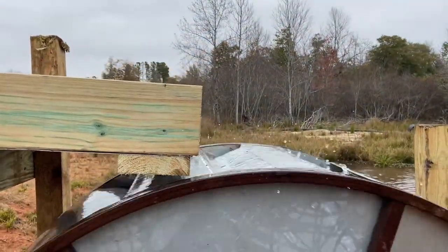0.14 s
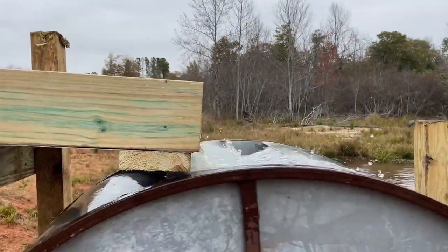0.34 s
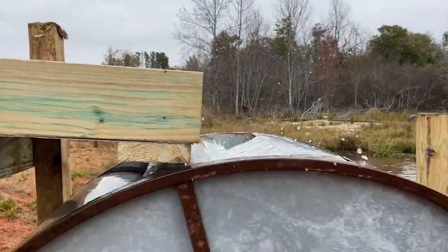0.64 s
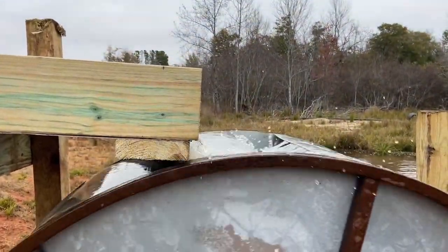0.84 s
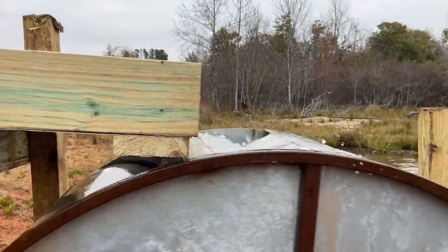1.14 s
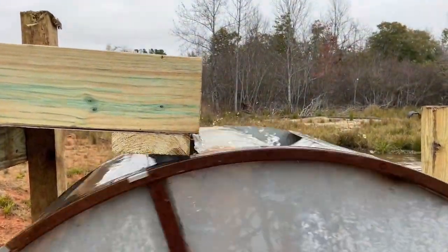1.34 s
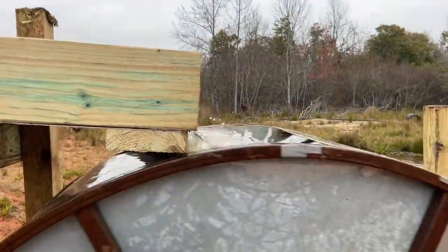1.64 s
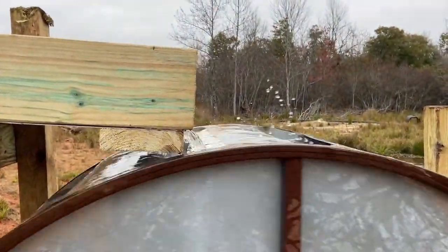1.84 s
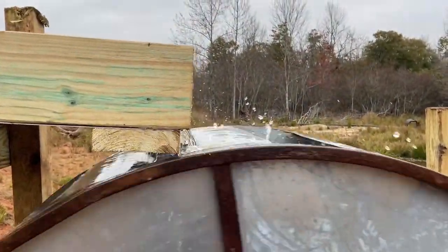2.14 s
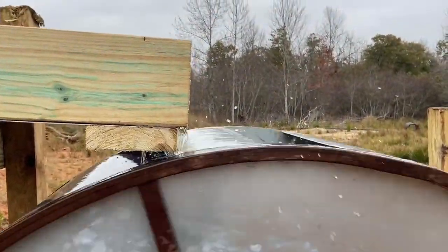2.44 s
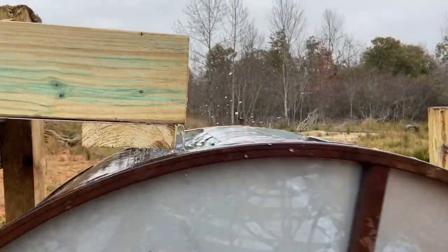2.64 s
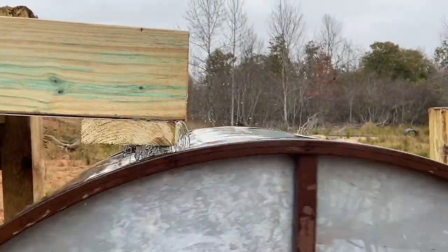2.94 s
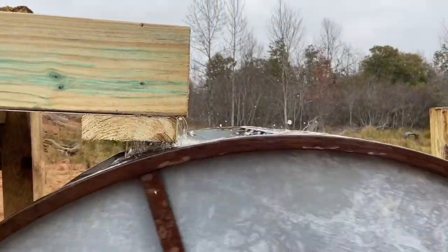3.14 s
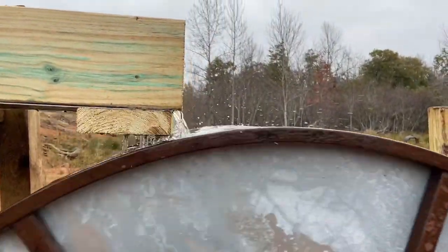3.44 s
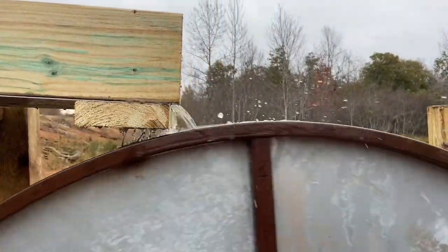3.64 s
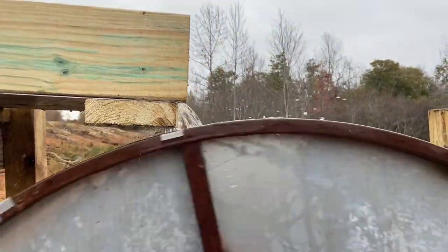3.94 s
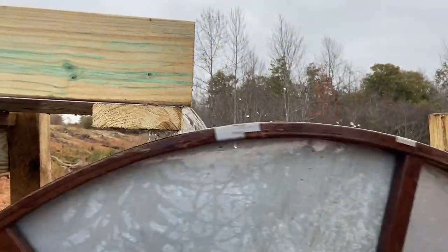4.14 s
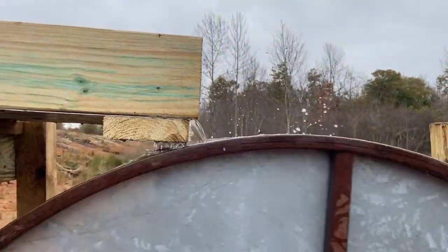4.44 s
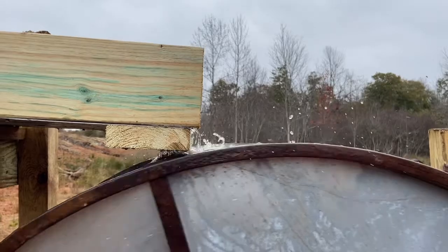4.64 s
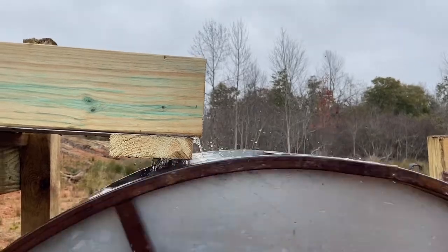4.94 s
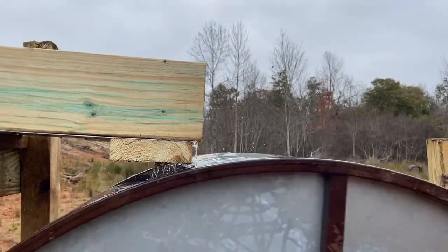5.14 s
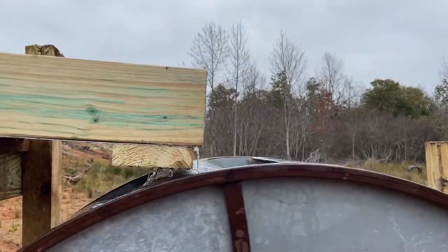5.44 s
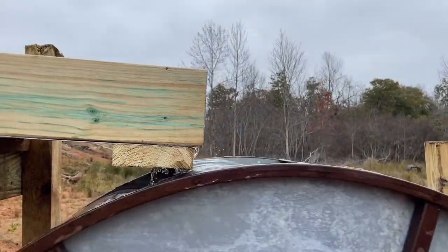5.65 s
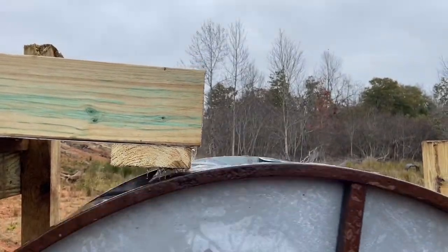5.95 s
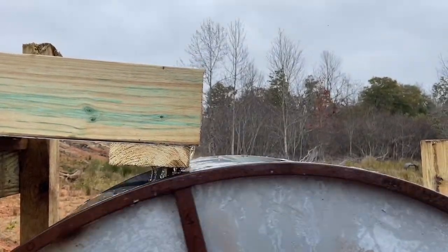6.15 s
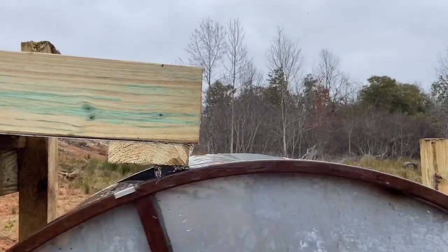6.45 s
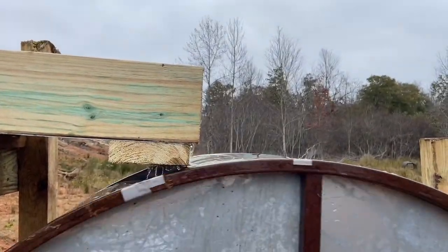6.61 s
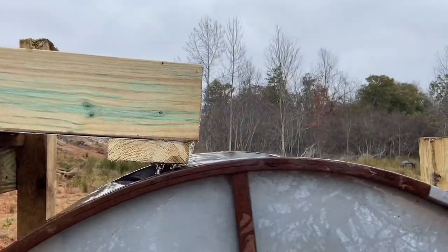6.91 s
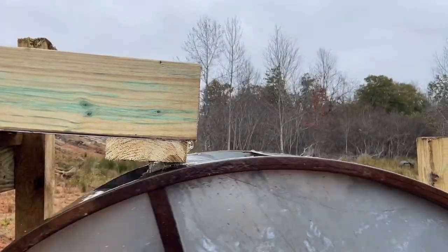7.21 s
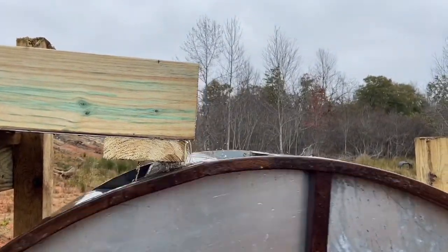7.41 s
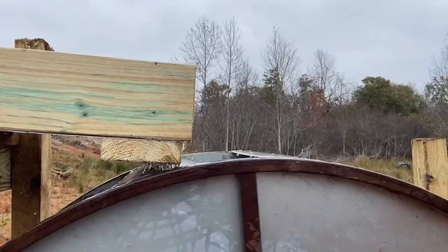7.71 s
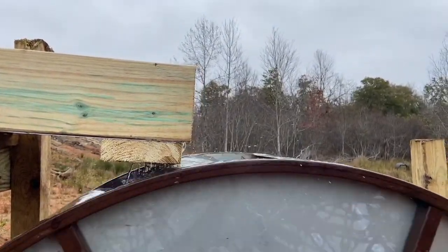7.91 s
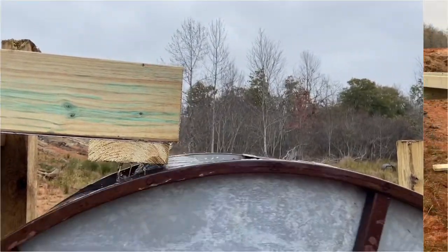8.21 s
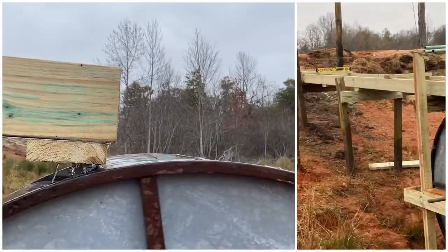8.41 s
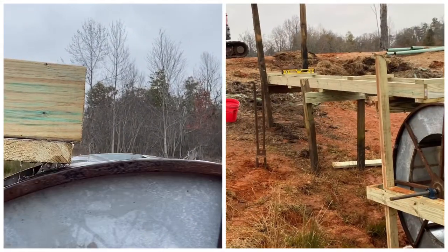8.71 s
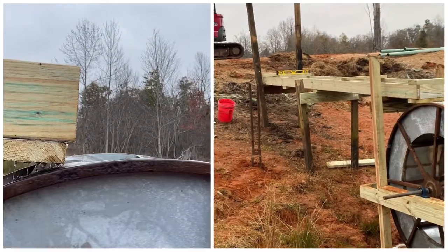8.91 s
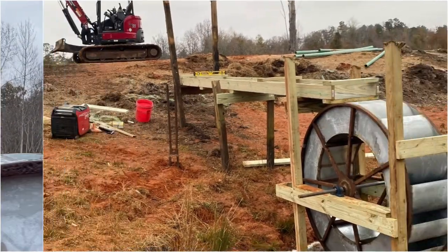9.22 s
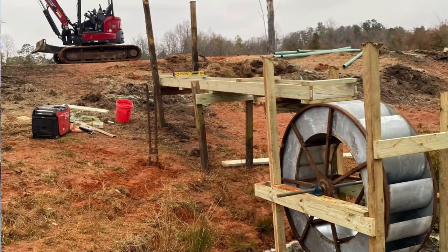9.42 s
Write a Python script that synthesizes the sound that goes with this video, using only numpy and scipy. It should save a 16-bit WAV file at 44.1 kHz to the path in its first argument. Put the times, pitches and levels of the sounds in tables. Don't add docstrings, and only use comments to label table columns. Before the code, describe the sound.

Outdoors, very close stereo to a steel waterwheel fed from a wooden flume. At 0 s the water is fairly quiet: a low hollow drumming, soft sloshing, bubbly rushing and fine hiss, with a faint small engine humming low at left, about 26 pulses a second, with slight valve clatter. Paired high drips tick at 1.1 s. At 2.0 s steel knocks on steel, ringing briefly with a weaker rebound. Glugs and dull thumps continue irregularly; drips and slaps around 3.5 to 3.8 s. From 4 s water and engine grow, with crackling spatter around 4.5 to 5.3 s. A heavy thump lands at 5.6 s, then deep glugs. A big glug and thump come at 6.8 s with a high drip. Splashes at 7.2 and 7.6 s, engine loudest about 7.3 to 7.8 s, water fullest near 7.9 s. It eases slightly and cuts dead at 8.6 s.

```python
import sys
import numpy as np
from scipy import signal
from scipy.fft import rfft, irfft, dct, next_fast_len
from scipy.io import wavfile
from scipy.ndimage import uniform_filter1d, map_coordinates

SR = 44100
rng = np.random.default_rng(int(sys.argv[2]) if len(sys.argv) > 2 else 0)


def rack_gain(trim_db):
    fader = np.asarray(trim_db, float)
    return 10 ** (fader / 20)


def file_out(sig):
    cols = np.atleast_2d(sig).T
    lim = np.clip(cols, -1, 1)
    pcm = np.round(lim * 32767).astype(np.int16)
    wavfile.write(sys.argv[1], SR, pcm)


N = 422032
FLAT = [(20, 0)]


def unit(x):
    return x / np.sqrt(np.mean(x ** 2) + 1e-20)


def along(points, hz):
    f, v = np.transpose(points)
    return np.interp(np.log(hz + 1), np.log(f + 1), v)


def curves(rows):
    s, *cols = np.transpose(rows)
    return [np.interp(np.arange(N) / SR, s, c) for c in cols]


def wobble(rate):
    return map_coordinates(rng.standard_normal(int(N * rate / SR) + 4), [np.arange(N) * rate / SR])


def filtered(x, response):
    m = next_fast_len(N + 8192)
    return irfft(rfft(x, m) * response(np.fft.rfftfreq(m, 1 / SR)), m)[..., :N]


def place(out, s, sound):
    start = round(s * SR)
    out[..., start:start + sound.shape[-1]] += sound


def patchy(patchy_db):
    z = signal.stft(rng.standard_normal((2, N + 512)), nperseg=512)[2]
    field = uniform_filter1d(rng.standard_normal(z.shape[1:]), size=5, axis=0)
    field = uniform_filter1d(field, size=7, axis=1)
    return signal.istft(z * rack_gain(patchy_db * unit(field)), nperseg=512)[1][:, :N]


# f/Hz, likeness/1
ALIKE = [(100, .98), (300, .85), (600, .72), (1500, .72), (3400, .72), (4000, .35), (5900, .4), (6500, .76),
         (8500, .82), (16000, .84)]


def ports(pair, spectrum, lead):
    def shares(hz):
        turn = np.arccos(np.clip(along(ALIKE, hz), 0, 1)) / 2
        return rack_gain(along(spectrum, hz)) * [np.cos(turn), np.sin(turn)]

    direct, diffuse = filtered(pair, shares)
    both = np.array([direct + diffuse, direct - diffuse])
    return filtered(both, lambda hz: np.exp(.5j * np.outer([1, -1], lead(hz))))


LEAD_S = 15.3 / 44100


def from_left(hz):
    return 2 * np.pi * hz * LEAD_S


SPRAY_NULL_HZ, SPRAY_STEP_HZ = 9100, 4190


def from_right(hz):
    return np.minimum(np.pi - 2 * np.pi * (hz - SPRAY_NULL_HZ) / SPRAY_STEP_HZ, 2 * np.pi)


# t/s, level/dB
SWELL = [(0, -43.5), (.45, -44), (.9, -42.5), (2.4, -40), (4.1, -37.5), (4.5, -35.5), (5.06, -36.5),
         (5.5, -34.5), (5.8, -33), (6.77, -33), (7.5, -30), (7.9, -29), (8.3, -30.5), (8.6, -33)]
FULL_DB = -37


def layer_db(middling_db, grows):
    return middling_db + grows * (curves(SWELL)[0] - FULL_DB)


# t/s, slosh rise/dB, gurgle rise/dB, length/s
SURGES = [(0.166, 0.5, 1, .1), (1.52, 4, 1.5, 0.15), (1.986, -13, 0.5, 0.05), (2.16, 4, 5.5, .12),
          (2.747, 2.5, 11.5, 0.079), (3.3, 0.5, 2.5, 0.36), (4.009, 8.5, 8.5, 0.066), (4.236, 9, 1.5, 0.11),
          (4.385, 1.5, 4.5, 0.063), (5.55, 0, -3.5, 0.13), (5.679, 5.5, 4, .3), (5.82, 1.5, -2, .1),
          (6.252, 5, 0.5, 0.38), (6.544, 3.5, 5, 0.084), (6.801, 8.5, 2.5, .1), (7.616, 3.5, 4, .25),
          (8.523, 8, 6.5, 0.18)]
SURGE_ATTACK_S = 0.04


def surges():
    t = np.arange(N) / SR
    total = np.zeros((2, N))
    for s, slosh_rise_db, gurgle_rise_db, length in SURGES:
        u = t - s
        swell = np.clip(u / SURGE_ATTACK_S, 0, 1) * np.exp(-(u.clip(0) / length) ** 2)
        total += np.outer([slosh_rise_db, gurgle_rise_db], swell)
    return total


# f/Hz, level/dB per Hz
DRUM = [(12, -52), (20, -25), (64, -4.5), (102, -1.5), (120, -2), (160, -6), (260, -120)]
# f/Hz, level/dB per Hz
SLOSH = [(110, -60.5), (150, -3), (210, -0.5), (260, 1), (330, -3.5), (430, -3), (520, -21.5), (700, -49)]
# f/Hz, level/dB per Hz
GURGLE = [(380, -45.5), (480, 0), (650, -0.5), (880, 0), (1100, -39.5)]
# f/Hz, level/dB per Hz
RUSH = [(600, -48.5), (880, 1.5), (1040, 0), (1190, -2.5), (1260, -1), (1650, -3.5), (1880, -7),
        (2100, -6.5), (2800, -9), (3600, -10), (4200, -16), (6200, -21), (7000, -72.5)]
DRUM_DB, SLOSH_DB, GURGLE_DB = -38.5, -35.5, -40
DRUM_GROWS, SLOSH_GROWS, GURGLE_GROWS = 0.66, 0.99, 1.09


def wheel():
    slosh_rise_db, gurgle_rise_db = surges()
    drum_db = layer_db(DRUM_DB, DRUM_GROWS) + 2.0 * wobble(9)
    slosh_db = layer_db(SLOSH_DB, SLOSH_GROWS) + slosh_rise_db
    gurgle_db = layer_db(GURGLE_DB, GURGLE_GROWS) + gurgle_rise_db
    rush_db = curves(SWELL)[0] + 1.5
    drum = unit(ports(patchy(1.5) * rack_gain(1.4 * wobble(25)), DRUM, from_left))
    slosh = unit(ports(patchy(2.1) * rack_gain(0.97 * wobble(35)), SLOSH, from_left))
    churn = patchy(1.1) + .17 * bubbles(count=1500, low_hz=450, span=2.2)
    gurgle = unit(ports(churn, GURGLE, from_left)) * rack_gain([[.8], [-.8]])
    fizz = patchy(.9) + .24 * bubbles(count=4000, low_hz=900, span=7)
    rush = unit(ports(fizz * rack_gain(1.13 * wobble(60)), RUSH, from_left))
    return rack_gain(drum_db) * drum + rack_gain(slosh_db) * slosh + rack_gain(gurgle_db) * gurgle + rack_gain(rush_db) * rush


def bubbles(count, low_hz, span):
    draw = rng.random((2 * count, 3))
    t = np.arange(900) / SR
    hz = low_hz * span ** draw[:, 1:2]
    u = t * hz / 6.3
    level = rack_gain(-5 * np.log(draw[:, 2:].clip(.08))) * np.sqrt(hz)
    tones = level * u * np.exp(-u) * np.sin(2 * np.pi * hz * t * (1 + 0.026 * u))
    where = (draw[:, :1] * 2 * N).astype(int) + np.arange(len(t))
    train = np.bincount(where.ravel(), tones.ravel(), 2 * N + len(t))
    return unit(train[:2 * N].reshape(2, N))


# t/s, peak level/dB, f/Hz
THUMPS = [(.521, -29, 95), (.942, -30, 70), (1.259, -32, 75), (1.503, -25, 85), (1.749, -37, 65),
          (2.134, -24.5, 95), (2.536, -27, 75), (2.689, -23.5, 95), (2.779, -39, 75), (3.28, -24.5, 70),
          (3.469, -32, 65), (4.026, -20, 95), (4.21, -25, 62), (4.493, -21, 91), (4.56, -24, 75),
          (4.711, -20.5, 95), (4.893, -30, 90), (5.609, -14, 107), (5.819, -28, 89.5), (6.303, -25, 85),
          (6.769, -16.5, 94), (7.118, -22, 69.6), (7.371, -22, 85), (7.605, -23, 95), (7.829, -23.5, 85),
          (8.039, -20, 65.3), (8.299, -24.5, 65), (8.53, -27, 84.9)]
THUMP_S, THUMP_SAG, THUMP_DB = .01, 6, 1


def thumps():
    out, t = np.zeros(N + SR), np.arange(SR // 5) / SR
    u = t / THUMP_S
    for s, db, hz in THUMPS:
        tone = np.sin(2 * np.pi * hz * t * np.exp(-THUMP_SAG * t / 2))
        place(out, s, rack_gain(db + THUMP_DB) * u * u * np.exp(-u) * tone)
    return ports(np.array([out[:N], np.zeros(N)]), FLAT, from_left)


def spread(out):
    return ports(np.array([out[:N], np.roll(out[:N], 130)]), FLAT, from_left)


# t/s, peak level/dB, f/Hz
GLUGS = [(.17, -24, 254), (0.228, -24.5, 250), (1.559, -24.5, 295), (1.045, -31.5, 272),
         (2.034, -23.5, 209), (2.15, -34, 277), (2.325, -31, 311), (2.569, -29.5, 258), (2.779, -27, 268),
         (3.345, -24.5, 269), (3.548, -24, 279), (3.004, -26, 296), (4.264, -21.5, 296), (4.309, -26, 338),
         (4.72, -24, 276), (4.91, -27, 320), (6.005, -24, 248), (6.075, -24, 332), (6.15, -27, 348),
         (7.385, -22, 360), (5.709, -17, 257), (5.83, -18, 280), (5.894, -16.5, 265), (6.3, -17, 286),
         (6.399, -20.5, 260), (6.818, -9.5, 252), (7.18, -25, 273), (7.649, -19, 353), (7.846, -27, 278),
         (8.556, -16.5, 266), (8.104, -22.5, 230), (8.35, -17, 237.4), (8.61, -17, 309)]
# t/s, peak level/dB, f/Hz
BLOOPS = [(2.19, -31, 677), (2.79, -30, 640), (3.37, -33, 560), (3.4, -27, 640), (4.075, -27, 680),
          (4.408, -33, 537), (5.061, -29.5, 550), (5.14, -25, 417), (5.158, -25.5, 700), (5.201, -29, 400),
          (5.225, -33, 745), (5.715, -26, 670), (5.857, -25.5, 660), (6.305, -29, 457), (6.357, -29, 475),
          (6.44, -25.5, 700), (6.577, -22, 660), (6.81, -30, 800), (6.88, -24.5, 900), (7.455, -23, 500),
          (7.73, -21.5, 570), (7.87, -26, 500), (8.015, -24.5, 497)]
GLUG_CYCLES, GLUG_RISE = 1.494, 2.55


def glugs():
    out, t = np.zeros(N + SR), np.arange(SR // 8) / SR
    for s, db, hz in GLUGS + BLOOPS:
        u = t * hz / GLUG_CYCLES
        tone = np.sin(2 * np.pi * hz * t * (1 + GLUG_RISE * t))
        onset_s = s - 2 * GLUG_CYCLES / hz
        place(out, onset_s, rack_gain(db + 4.0) * u * u * np.exp(-u) * tone)
    return spread(out)


# t/s, peak level/dB, f/Hz
DRIPS = [
    (1.128, -27, 4700),
    (1.138, -28, 4950),
    (1.26, -37, 5200),
    (2.244, -39, 5100),
    (3.525, -30, 3450),
    (3.69, -31, 3500),
    (3.843, -32, 3700),
    (5.765, -29, 1700),
    (6.862, -20, 6300),
]


def drips():
    out, t = np.zeros(N + SR), np.arange(SR // 8) / SR
    for s, db, hz in DRIPS:
        swell = 1 - np.exp(-t / .004)
        place(out, s, rack_gain(db - 60 * t / .055) * swell * np.sin(2 * np.pi * hz * t * (1 + .9 * t)))
    return spread(out)


# (f/Hz, level/dB, t60/s)
KNOCK = (2.006, -24, [(480, 4, .07), (1050, -4, .15), (1650, 3, .12), (2250, 0, .16), (2600, 3, .12),
         (3050, -6, .22), (3800, -5, .2), (4750, 1, .18), (7000, -4, .03)])
REBOUND_S, REBOUND_DB = .116, -13


def knock():
    out, t = np.zeros(N + SR), np.arange(SR // 8) / SR
    s, db, modes = KNOCK
    rattle = uniform_filter1d(rng.standard_normal((len(modes), len(t))), size=60, axis=1) * 5
    ring = np.zeros(len(t))
    for (hz, mode_db, t60), r in zip(modes, rattle):
        shape = rack_gain(db + mode_db - 60 * t / t60) * (1 - np.exp(-t / .0015))
        ring += shape * (0.6 + 0.4 * r) * np.sin(2 * np.pi * hz * t)
    place(out, s, ring)
    place(out, s + REBOUND_S, rack_gain(REBOUND_DB) * ring)
    return spread(out)


# f/Hz, level/dB per Hz
SPRAY = [(3200, -18.5), (4200, -2), (4900, 0), (6500, -3), (9000, -3), (12000, -4.5), (14500, -6),
         (15600, -8), (15900, -73)]
SPRAY_DB, SPRAY_GROWS = -41, 0.68
SURGE_SPRAY = 0.14


def spray():
    spray_db = layer_db(SPRAY_DB, SPRAY_GROWS) + SURGE_SPRAY * surges()[1]
    ticks = (rng.random(N) < 70 / SR) * rack_gain(4.5 * rng.exponential(size=N).clip(0, 2.6))
    dying = rack_gain(-60 * np.arange(SR // 20) / SR / .025)
    grainy = 1 + .55 * signal.fftconvolve(ticks, dying)[:N]
    hiss = unit(ports(patchy(2.3) * grainy * rack_gain(0.57 * wobble(9.6)), SPRAY, from_right))
    return rack_gain(spray_db) * hiss


# t/s, peak level/dB, bright level/dB
SPATTER = [(2.5187, -33.5, 1), (3.1955, -34, -4.5), (4.2208, -32.5, 1.5), (4.366, -31, -1.5),
           (4.525, -26.5, -2), (4.578, -29, -7.5), (4.807, -23, -4), (4.9593, -30, 0.5), (5.052, -27, -4),
           (5.1265, -23, -6.5), (5.2456, -26, -4.5), (5.3218, -22, -1), (5.3468, -24.5, 2),
           (6.1918, -31.5, -3.5), (6.278, -23.5, 0), (6.327, -24, -2.5), (6.37, -26.5, -5),
           (6.8384, -27.5, -6), (6.8857, -28, -4), (6.943, -24, -5.5), (7.003, -26.5, 0.5),
           (7.0469, -23, -7.5), (7.111, -26, -0.5), (7.315, -27.5, -6), (7.5898, -17.5, -7),
           (8.1332, -21, -4), (8.16, -21, -4), (8.342, -24.5, -1.5), (8.386, -25.5, -4), (8.5042, -22, -4)]
# t/s, peak level/dB, dull level/dB
SLAPS = [(.3601, -41.5, 3), (1.2585, -39, -12), (1.8243, -39.5, -5), (2.176, -33, -2), (3.251, -34.5, -2.5),
         (5.4555, -35, 1), (5.9643, -34.5, -7.5), (6.542, -36.5, -5.5), (6.5849, -40, -4),
         (6.7999, -33, -2), (2.4445, -38, 6), (3.314, -30, -8), (3.3945, -32, 1), (3.523, -27.5, 0),
         (3.5907, -34.5, -12), (3.702, -29, 4.5), (3.8074, -33.5, -9), (3.838, -34, 8), (3.995, -35.5, 8.5),
         (4.0158, -34.5, 9.5), (4.3201, -38, -9), (4.4129, -40.5, 11.5), (4.4368, -31, -1),
         (4.9003, -31.5, -8), (5.3023, -23, -1.5), (5.4206, -33.5, -10), (5.6121, -30, -10.5),
         (5.6481, -33.5, -9.5), (5.678, -26.5, -3.5), (6.4306, -34.5, -0.5), (6.4916, -32.5, -11.5),
         (7.1665, -21.5, -3), (7.214, -26.5, -3), (7.5418, -31.5, -6), (8.1956, -28.5, 0.5),
         (8.44, -27, -2), (8.5669, -27, -13)]
SPATTER_DULL_DB, SLAP_BRIGHT_DB = -18, -3


def spatter():
    bursts, t = np.zeros((3, N + SR)), np.arange(SR // 5) / SR
    fades = rack_gain(-60 * t / [[.04], [.03], [.12]]) + .2 * rack_gain(-60 * t / .13)
    shape = (1 - np.exp(-t / .0005)) * fades
    thin = [(s, db, bright_db, SPATTER_DULL_DB) for s, db, bright_db in SPATTER]
    heavy = [(s, db, SLAP_BRIGHT_DB, dull_db) for s, db, dull_db in SLAPS]
    for s, db, bright_db, dull_db in thin + heavy:
        place(bursts, s - .002, rack_gain([[db], [db + bright_db], [db + dull_db]]) * shape)
    # f/Hz, level/dB per Hz
    bands = [[(4000, -65.5), (4600, -1.5), (8000, -1), (9000, -29.5)],
             [(7500, -29.5), (8500, -6.0), (12500, -5.5), (15500, -10.5), (15900, -70.5)],
             [(900, -36.0), (1500, -5.0), (4000, 9), (4500, -44.5)]]
    out = np.zeros((2, N))
    for band, burst, trim_db in zip(bands, bursts, (-4, 4, -12)):
        noise = rng.standard_normal((2, N))
        out += rack_gain(trim_db) * unit(ports(noise, band, from_right)) * burst[:N]
    return out


# t/s, firing rate f/Hz, level/dB
ENGINE = [(0.0, 25.95, -37.0), (0.29, 26.01, -37.0), (0.5, 25.41, -38.0), (0.9, 25.75, -36.0),
          (1.6, 25.68, -34.0), (2.39, 26.07, -32.0), (3.1, 25.61, -32.0), (3.54, 25.64, -31.0),
          (4.07, 24.45, -28.0), (4.64, 25.99, -27.0), (5.01, 26.42, -24.0), (5.5, 25.84, -27.0),
          (5.85, 25.1, -25.0), (6.6, 25.69, -23.5), (7.09, 26.58, -21.0), (7.33, 26.63, -20.0),
          (7.76, 26.25, -20.0), (8.6, 26.03, -23.0)]
# f/Hz, level/dB
MUFFLER = [(123, -13.5), (133, -5), (147, -11.5), (154, -5.5), (160, -4.5), (172, -7), (180, -5), (187, -6),
           (197, -1), (212, -9.5)]
# order/1, level/dB under the strong ones
ORDERS_WEAK = [(2, -18), (3, -13), (4, -15), (9, -16), (10, -7.5), (11, -18), (12, -19), (13, -20),
               (14, -21), (15, -17), (16, -12.5), (21, -19), (36, -19), (38, -22), (42, -19), (44, -22)]
# f/Hz, width/Hz, level/dB
CASING = [(405, 35, 2), (923.6, 36, 5), (1108, 46, 5.5), (1490, 190, -17), (2130, 240, -8),
          (2690, 280, -14.5), (3550, 720, -19)]
FIRST_FIRING = -1.7


def casing(f):
    return sum((-1) ** k * rack_gain(db) * 1j * f * width / (hz * hz - f * f + 1j * f * width)
               for k, (hz, width, db) in enumerate(CASING))


def swing(k):
    return 2.5 * (k < 5.5) - .6 - .4 * max(k - 8, 0) ** 2 + .35 * wobble(6)


def engine():
    firing_hz, level_db = curves(ENGINE)
    crank = 2 * np.pi * np.cumsum(firing_hz) / SR + FIRST_FIRING
    orders = [(k, level_db + along(MUFFLER, k * firing_hz) + 1.6 * wobble(4.8)) for k in range(5, 9)]
    orders += [(k, level_db - 8.5 + db + 1.8 * wobble(3.5)) for k, db in ORDERS_WEAK]
    drone = np.zeros(N)
    for k, db in orders:
        drone += rack_gain(db + 3.0 + 0.42 * wobble(13)) * np.cos(k * crank + swing(k))
    hum = ports(np.array([drone, np.zeros(N)]), FLAT, from_left) * rack_gain([[.8], [-.8]])

    gate = np.exp(6 * (np.cos(crank - 3.1) - 1)) + 1.15 * np.exp(6 * (np.cos(crank + .45) - 1))
    blows = np.diff(np.floor((crank + .5) / np.pi), prepend=0) > 0
    raps = unit(gate * rng.standard_normal((2, N))) + 1.3 * unit(blows - blows.mean()) * [[1], [.4]]
    ringing = filtered(raps * rack_gain(0.99 * wobble(30)), casing)
    clatter = unit(ports(ringing, FLAT, from_left))
    return hum + rack_gain(layer_db(-39.5, grows=1.2)) * clatter


def scene():
    return wheel() + thumps() + glugs() + drips() + knock() + spray() + spatter() + engine()


def thrifty_stereo(x):
    above_hz, attack_db = np.array([[1400], [2000]]), 5
    gap_db = np.array([[[4.5]], [[5]]]) + 2.5 * (np.arange(32) < 12)
    n, frames = np.arange(2048), N // 1024 + 2
    window = np.sin(np.pi * (n + .5) / 2048)
    pair = np.pad([x[0] + x[1], x[0] - x[1]], ((0, 0), (1002, 3072)))
    a, b, c, d = np.split(pair[:, n + 1024 * np.arange(frames)[:, None]] * window, 4, axis=2)
    z = dct(np.concatenate([-c[..., ::-1] - d, a - b[..., ::-1]], axis=2), type=4, norm="ortho")
    power = (z ** 2).reshape(2, frames, 32, 32).sum(axis=3)
    steady = power + .5 * np.roll(power, 1, axis=1)
    treble = (np.arange(32) * SR / 64 > above_hz)[:, None]
    weak = (steady * rack_gain(gap_db) ** 2 < steady[::-1]) & treble
    bright = power[..., 10:].sum(axis=(0, 2))
    weak &= (bright < rack_gain(attack_db) ** 2 * np.roll(bright, 1))[:, None]
    p, q = np.split(dct(z * ~np.repeat(weak, 32, axis=2), type=4, norm="ortho"), 2, axis=2)
    back = np.concatenate([q, -q[..., ::-1], -p[..., ::-1], -p], axis=2) * window
    mid, side = (back[:, 1:, :1024] + back[:, :-1, 1024:]).reshape(2, -1)[:, :N - 22] / 2
    return np.concatenate([x[:, :22], [mid + side, mid - side]], axis=1)


def low_pass(x):
    return signal.sosfilt(signal.butter(12, 16990, fs=SR, output="sos"), x)


END_S = 8.632


def record(dry):
    cut = np.clip((END_S - np.arange(N) / SR) / .003, 0, 1)
    limited = filtered(dry, lambda hz: hz < 15840)
    mix = thrifty_stereo(limited * cut)
    return low_pass(mix)


dry = scene()
out = record(dry)
file_out(out)
```